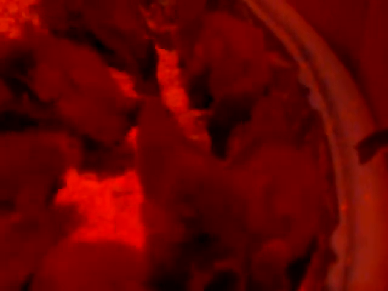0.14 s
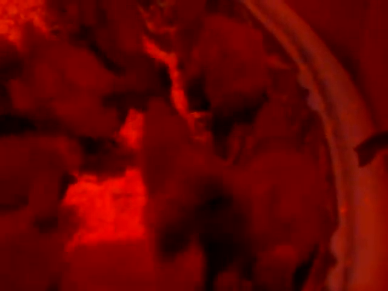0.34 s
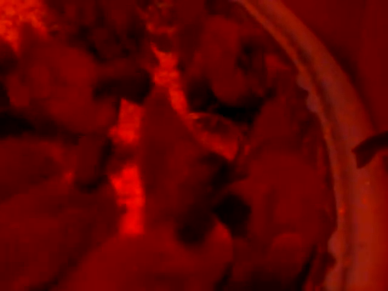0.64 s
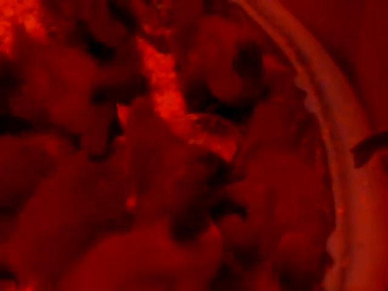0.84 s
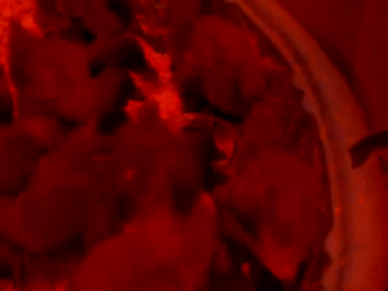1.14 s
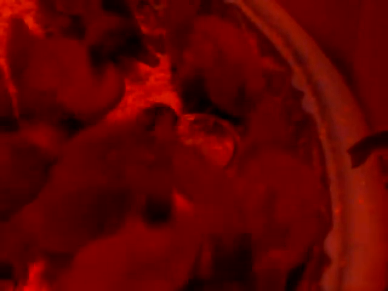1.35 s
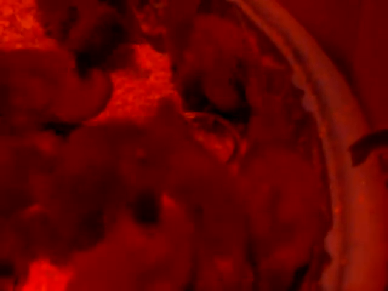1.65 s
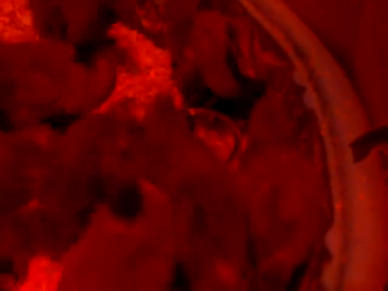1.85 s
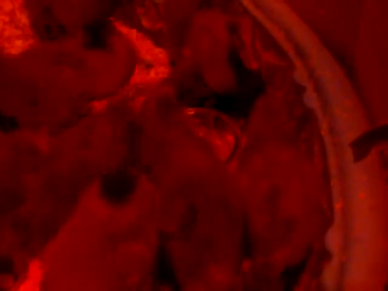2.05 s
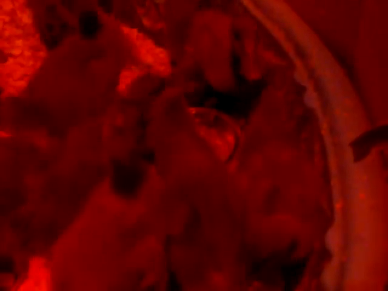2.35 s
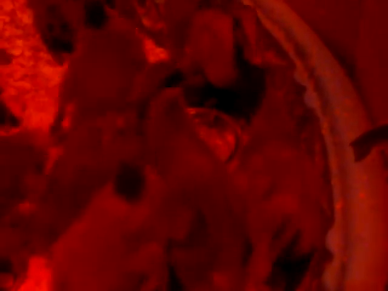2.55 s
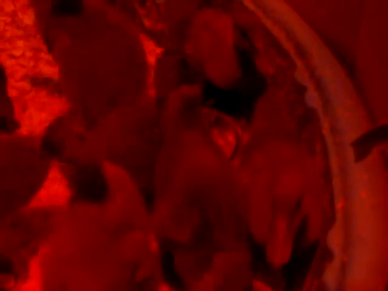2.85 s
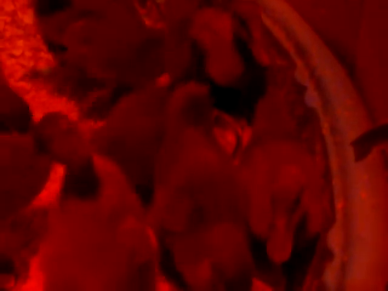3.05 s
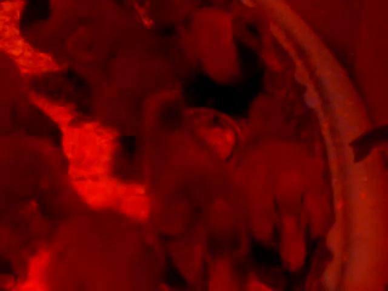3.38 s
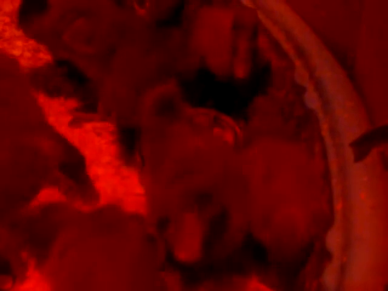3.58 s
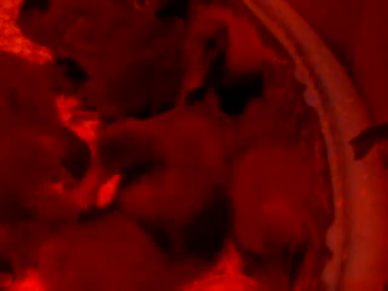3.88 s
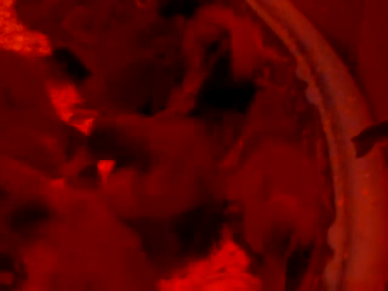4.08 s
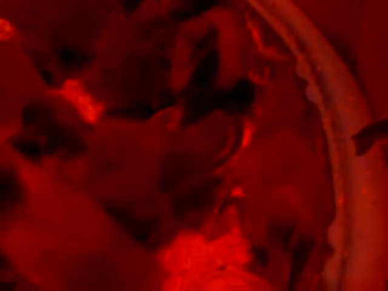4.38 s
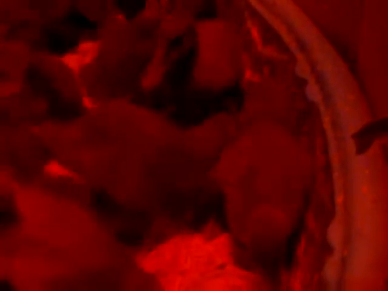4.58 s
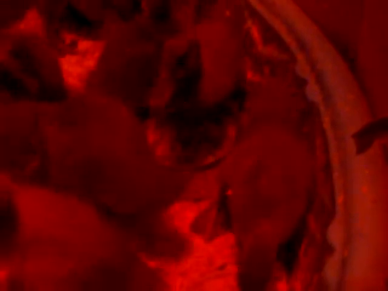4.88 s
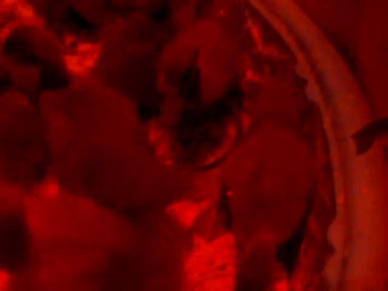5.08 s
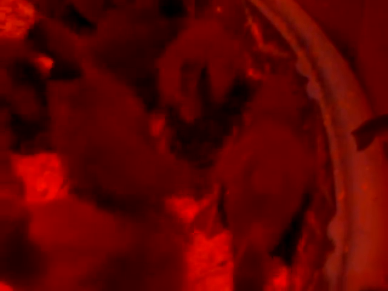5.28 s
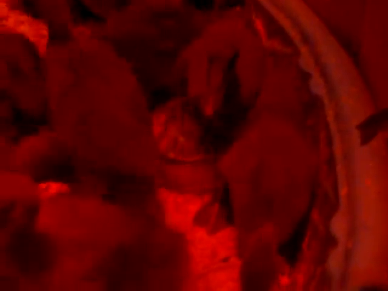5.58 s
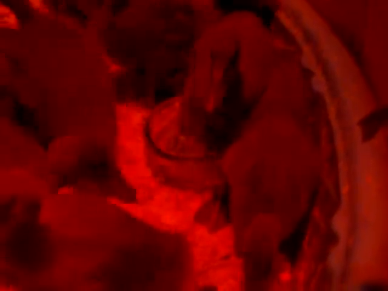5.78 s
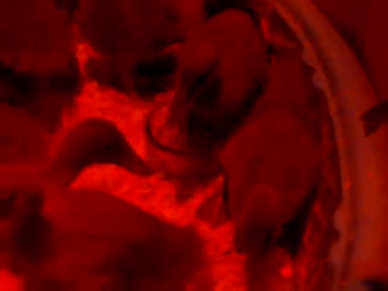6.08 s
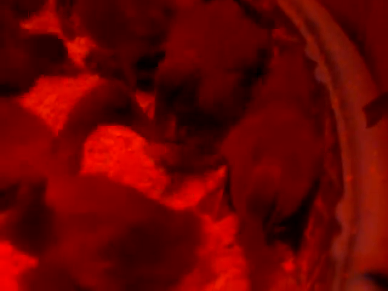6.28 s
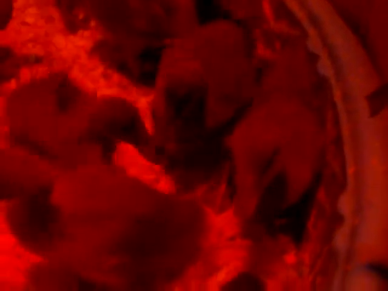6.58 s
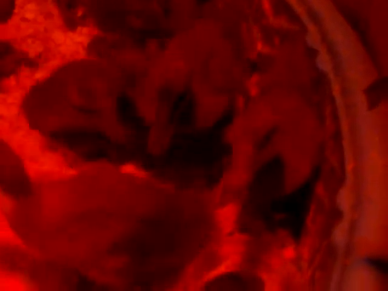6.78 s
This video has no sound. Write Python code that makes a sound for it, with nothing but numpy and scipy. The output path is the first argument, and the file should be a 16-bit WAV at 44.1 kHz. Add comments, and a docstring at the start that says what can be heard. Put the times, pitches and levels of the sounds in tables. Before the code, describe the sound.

Close to a group of ducklings in an indoor plastic brooder, dry clicks of pecking bills mix with crunching bedding and brief, whistling peeps. The feeding is busy at first, eases off, then gives way to small knocks and dull footfalls on the tub as the peeping returns and bunches up near the end. A metal part pings faintly a few times, and a soft hiss runs throughout.

```python
"""Ducklings peep round a feeder in a plastic brooder tub indoors, heard from close up.
Each peep is a short arched whistle of the syrinx, driven by one push of air. Bills snap at the feed,
dabble in the hollow dish and knock on the tub; feet thud, scuff and crunch the bedding, and a metal
part rings faintly. The tub walls and the room throw it all back, over a low drone and a steady hiss."""
import sys
import numpy as np
from scipy import signal
from scipy.fft import rfft, irfft, next_fast_len
from scipy.io import wavfile

SR = 44100
rng = np.random.default_rng(int(sys.argv[2]) if len(sys.argv) > 2 else 0)


def wav_out(sig):
    """Save sig, one row per channel (or a flat mono array), as 16-bit PCM at SR to the path in sys.argv[1]."""
    wavfile.write(sys.argv[1], SR, np.round(np.clip(np.atleast_2d(sig).T, -1, 1) * 32767).astype(np.int16))


N = 305613
TIME = np.arange(N) / SR


def peeps(rise_share=.44, rounding=.407, jitter=.0035, shimmer=.266, flutter_hz=270, side_ratio=1.6):
    """The syrinx whistles a near sine whose pitch and loudness arch with one push of air."""
    # one peep a row: top_s, length_s, top_hz, ends_hz, level_db, second_side_db (of the syrinx),
    # loudness_lag_s (behind the pitch), dip_db (at the top, negative thins it), rasp_db
    calls = [(0.574, .062, 2770, 1780, -56, -30, -0.01, 3, -18),
             (.950, 0.0654, 2670, 1600, -41, -11, 0.00035, -13.5, -8),
             (1.651, 0.055, 1750, 1454, -43.5, -30, -0.0035, -0.5, -16),
             (1.829, 0.052, 2296, 1503, -34.5, -14, -0.0045, -0.5, -17),
             (2.185, 0.068, 1985, 1512, -38.5, -29, -0.0015, 0.5, -14),
             (2.376, .058, 2275, 1574, -35.5, -20.5, -.001, 1.5, -30),
             (2.778, 0.058, 2302, 1480, -39, -17, 0.0016, -11.5, -10.5),
             (4.624, 0.05, 2088, 1492, -34.5, -30, -0.0019, 0, -30),
             (4.747, .076, 2260, 1616, -33.5, -32, 0.015, -2, -35),
             (5.120, 0.0596, 1962, 1430, -39, -28, -0.0011, 0, -17.5),
             (5.343, .0386, 1959, 1564, -35, -31, 0.00028, 1.5, -16),
             (5.706, 0.0492, 1964, 1450, -36.5, -33.5, -0.0024, 2, -21),
             (6.086, .066, 2414, 1724, -29.5, -40, 0.0067, -14.5, -27),
             (6.339, .05, 2257, 1644, -41, -40, -0.0024, -2, -22),
             (6.355, .054, 2844, 2145, -26.5, -43, -0.0053, -2, -21),
             (6.375, 0.0297, 2610, 2414, -30.5, -44, 0.0051, -0.5, -29),
             (6.395, 0.032, 2660, 2380, -33, -42.5, -0.0026, 1, -27)]
    out = np.zeros(N)
    for top, length, top_hz, ends_hz, db, side_db, lag, dip_db, rasp_db in calls:
        rise, fall = rise_share * length, (1 - rise_share) * length
        t = np.arange(-rise, fall, 1 / SR)
        off_top = t / np.where(t < 0, rise, fall)
        # a blunt arch: slack is 0 at the top and 1 at both ends
        slack = (np.hypot(off_top, rounding) - rounding) / (np.hypot(1, rounding) - rounding)
        hz = top_hz - slack * (top_hz - ends_hz)
        phase = 2 * np.pi * np.cumsum(hz * (1 + jitter * waver(len(t), 380))) / SR
        overtones = sum(amp(d) * np.sin(k * phase) for k, d in [(2, 0), (3, -11), (4, -19)])
        overtones *= amp(-21.5 - 27 * np.log2(top_hz / 2100))  # the higher the peep, the purer
        second_side = amp(side_db) * np.sin(side_ratio * phase)
        # slack membranes rasp; at a low pitch they also flap, chopping the ends of the note
        rasp = (amp(rasp_db) + amp(-7) * slack) * waver(len(t), 650)
        flap_depth = 1.1 * slack * np.clip((2000 - hz) / 400, 0, 1)
        flutter = flap_depth * np.sin(2 * np.pi * flutter_hz * t + waver(len(t), 160))
        upper = amp(.5) * (overtones + second_side) * (1 + .5 * waver(len(t), 325))
        tone = np.sin(phase) * (1 + rasp + flutter) + upper
        off_push = (t - lag) / np.where(t < lag, rise + lag, fall - lag)
        arch_db = -14 * (1 - np.exp(-(off_push / .55) ** 2))
        thinning_db = dip_db * np.exp(-(slack / .197) ** 2)
        push = amp(db + arch_db + thinning_db) * signal.windows.tukey(len(t), .15)
        add(out, top - rise, np.sqrt(2) * push * (1 + shimmer * waver(len(t), 72)) * tone)
    return out


def knocks(note_t60_s=.045, crack_s=.0045, rattle_s=.0263, trim_db=(-.8, -1, -14)):
    """A bill or foot rings the damped plastic tub, with a crack of contact and a rattle of feed."""
    # blows on the tub: start_s, level_db, note_hz (of the spot struck), brightness_db
    hits = [(0.291, -43, 580, 2.5), (.306, -49.5, 480, -1.5), (.595, -30.5, 905, 1), (.597, -30.5, 630, .5),
            (1.395, -43.5, 1246, 9), (3.711, -53, 586, 3), (4.393, -52, 556, -0.5), (5.198, -55.5, 487, -3),
            (5.312, -34.5, 480.8, 8), (5.335, -37.5, 433, -5), (5.592, -33, 430, 5.5),
            (5.606, -43, 405, -9), (5.778, -43, 443, -3.5), (5.866, -39.5, 521, -2.5),
            (5.896, -49, 533, -2), (5.911, -48, 550, 0.5), (5.983, -31.5, 415, 3), (6.011, -45, 410, -5.5),
            (6.048, -47.5, 403, 0.5), (6.132, -56.5, 560, -8.5), (6.172, -40, 408, -2),
            (6.201, -45.5, 502, -2.5), (6.219, -42.5, 462, -4.5), (6.272, -44.5, 397.3, -4),
            (6.435, -46, 568, -8), (6.464, -42.5, 588, 5.5)]
    # modes of the tub: pitch_hz, level_db, t60_s
    tub = [(410, 2.5, 0.041), (450, 4, 0.04), (521, -1, 0.049), (584, 1, 0.042), (703, -2, 0.029),
           (792, 3.5, 0.022), (890, -0.5, 0.029), (998, 3.5, 0.029), (1150, 10.5, .013), (1252, 3, 0.021),
           (1492, 0.5, 0.026), (1827.4, -2.5, 0.035), (2226, 5.5, 0.0212), (2850, 1.5, 0.0087)]
    # borders of the low, middle and high band: edge_hz
    edges = [255, 700, 1500, 5000]
    out, t = np.zeros(N), np.arange(SR // 5) / SR
    contact = amp(2) * np.exp(-t / crack_s) + amp(-8) * np.exp(-t / rattle_s)
    for start, db, note_hz, brightness_db in hits:
        # the struck spot radiates little below its own note
        modes = [(hz, mode_db - 9 * max(np.log2(note_hz / hz), 0), t60) for hz, mode_db, t60 in tub]
        low_cut = signal.butter(2, .7 * note_hz, "high", fs=SR, output="sos")
        body = ring([*modes, (note_hz, 1, note_t60_s)], t, detune=.017, spread_db=1.5)
        blow = signal.sosfilt(low_cut, body + contact * rng.standard_normal(len(t)))
        bands_db = db + brightness_db * np.arange(-1, 2)  # a harder contact trades bass for treble
        add(out, start, balance_bands(blow, edges, bands_db + trim_db, span_s=.027))
    return out


def snaps(crack_s=.0005, crumble_s=.0035, faint_count=10, busy_until_s=2.6, trim_db=-.5):
    """A bill shuts on a crumb: a dry crack and a brief crumbling ring the hollow of the bill."""
    # clear snaps at the feed: start_s, ring_hz, low_db, mid_db, high_db
    clear = [(0.0511, 9540, -73, -60.5, -49.0), (0.0842, 2230, -41.5, -64, -69),
             (0.1063, 6900, -55, -53.5, -48), (0.1192, 1960, -50, -53, -54.5),
             (0.1827, 6930, -68.5, -55, -49.5), (0.2548, 2120, -52, -53, -53),
             (0.3302, 4080, -52.5, -40.5, -48.5), (0.4294, 4170, -48.5, -40, -47),
             (0.4741, 6260, -62, -48.5, -45.5), (0.6687, 3910, -50.5, -43, -59),
             (0.6791, 10000, -47.5, -51, -46), (0.6932, 2560, -48.5, -53, -48),
             (0.7482, 1280, -44, -51, -60), (0.797, 4170, -42.5, -36.5, -52),
             (0.8026, 1830, -41, -50.5, -58), (0.8201, 1910, -45.5, -41.5, -44),
             (0.8576, 2360, -46.5, -50, -51.5), (0.8676, 7500, -62.5, -70, -47.5),
             (0.89, 2270, -56.0, -56.5, -56.0), (1.1143, 5090, -70, -55, -54),
             (1.1271, 1840, -47, -49.5, -52), (1.1481, 1230, -45.0, -56, -55),
             (1.169, 1265, -51.5, -50.5, -62.0), (1.1736, 1215, -44.5, -50, -50),
             (1.1964, 7050, -57, -65.5, -45), (1.2268, 3620, -43.5, -41.5, -61),
             (1.2333, 1933, -46, -57, -55), (1.2461, 1540, -49.5, -50, -55),
             (1.2851, 11710, -54, -54, -51.5), (1.3566, 1220, -45.0, -55.5, -59),
             (1.4096, 1380, -45, -63.5, -62.5), (1.4124, 1596, -49, -58.5, -51),
             (1.4225, 2355, -50, -62, -53), (1.7491, 8500, -69.5, -52.5, -45.0),
             (1.7742, 7480, -55, -50, -49.5), (1.7802, 2316, -42, -54.5, -57),
             (1.8039, 1850, -48.5, -44.0, -42.5), (1.8931, 1860, -47, -62, -66),
             (1.9796, 4660, -47, -40, -43.5), (1.9851, 5350, -53, -43.5, -54),
             (2.0302, 1860, -45.0, -55.0, -51.5), (2.0368, 4090, -56, -45, -56),
             (2.0747, 1264, -43.5, -55.5, -61), (2.0937, 4050, -57.0, -46, -51),
             (2.1303, 8650, -61.5, -51.5, -50), (2.2012, 4080, -40, -35.5, -46.5),
             (2.2354, 11400, -49.0, -59.5, -45), (2.2601, 3960, -47.5, -41.5, -57.0),
             (2.3117, 5800, -67.5, -50, -45), (2.4746, 1276, -48, -57.5, -64.5),
             (2.5219, 4300, -66.5, -42.5, -57.5), (2.5692, 9050, -63, -65.5, -54.5),
             (2.6836, 4380, -72.5, -52.5, -62.5), (2.8272, 1980, -47.5, -56, -53.0),
             (2.8315, 1920, -49, -67, -64), (3.2883, 7210, -52, -53, -48.5),
             (3.3522, 3820, -52.5, -38.5, -58.5), (3.4084, 3520, -61, -53, -70.0),
             (3.5053, 3620, -55.5, -53.5, -58.5), (3.528, 3840, -64.5, -50.5, -62),
             (4.1115, 1520, -57, -57.5, -67), (4.1381, 10060, -59, -59.0, -53.5),
             (4.3012, 4140, -59, -48.5, -52), (4.4304, 11910, -66.5, -64, -52.5),
             (4.8641, 2610, -49.5, -51, -57), (5.3096, 1150, -37.5, -53, -46),
             (6.4788, 10500, -52.5, -65.5, -51), (6.4954, 1725, -46, -51.5, -54),
             (6.7342, 10250, -52.5, -58.5, -50.5)]
    # broad resonances of a bill: frequency_hz, level_db
    bill = [(900, 2), (1900, 4), (2900, -6.5), (4000, 6), (5200, -5.5), (9000, -3), (11000, -8.5),
            (14500, -18)]
    # borders of the low, middle and high band: edge_hz
    edges = [1100, 2800, 5200, 14500]
    out, t = np.zeros(N), np.arange(SR // 16) / SR
    envelope = np.exp(-t / crack_s) + amp(-11) * np.exp(-t / crumble_s)
    hz, db = np.transpose(bill)
    faint = [(rng.uniform(0, busy_until_s), rng.uniform(1500, 7500), *rng.normal(-60.5, 4.5, 3))
             for _ in range(faint_count)]
    for start, ring_hz, *bands_db in [*clear, *faint]:
        colour = np.transpose([hz, db + rng.normal(0, 3, len(hz))])
        crack = coloured(envelope * rng.standard_normal(len(t)), colour) * (t < .04)
        hollow = amp(9) * signal.lfilter(*signal.iirpeak(ring_hz, Q=9, fs=SR), crack)
        add(out, start, balance_bands(crack + hollow, edges, np.add(bands_db, trim_db), span_s=.011))
    return out


def dabbling(strokes_per_s=18.1, stroke_spread_db=3.9, attack_s=.0017):
    """A dabbling bill pushes in quick even strokes; each sets the hollow dish humming briefly."""
    # bouts of dabbling: start_s, end_s, level_db, note_hz (lowest mode of the dish)
    bouts = [(0.03, .11, -46, 433.5), (0.209, .34, -48.5, 433.8), (.405, .58, -55, 442),
             (0.676, .75, -48, 430), (1.176, 1.47, -55.5, 424), (1.584, 1.61, -45.5, 441.2),
             (1.783, 2.3, -51, 409.7), (2.707, 2.74, -51.5, 407)]
    # modes of the feed dish: pitch_hz, level_db, t60_s
    dish = [(418.5, 3, 0.089), (454, 4, 0.0388), (861, -2, 0.046), (970, 0.5, 0.056)]
    out, t = np.zeros(N), np.arange(SR // 5) / SR
    onset = 1 - np.exp(-t / attack_s)
    for start, end, db, note_hz in bouts:
        modes = np.multiply(dish, [note_hz / dish[0][0], 1, 1])
        for stroke in np.arange(start, end, 1 / strokes_per_s):
            push = amp(db - rng.normal(0, stroke_spread_db))
            add(out, stroke, push * onset * ring(modes, t, detune=.04, spread_db=2))
    return out


def pings(modes_hz=(1915, 4820), t60s_s=(.13, .04)):
    """Two thin metal modes ring on after a light touch."""
    # touches on a metal part: start_s, low_mode_db, high_mode_db
    touches = [(.540, -46.5, -36.5), (2.700, -52, -47), (2.791, -50, -42), (2.980, -53, -73.5),
               (3.188, -52, -72), (4.462, -43.5, -52), (6.294, -42, -70.5), (6.602, -55.5, -49)]
    out, t = np.zeros(N), np.arange(SR // 4) / SR
    for start, *levels_db in touches:
        for hz, t60, db in zip(modes_hz, t60s_s, levels_db):
            add(out, start, amp(db - 60 * t / t60) * np.sin(2 * np.pi * hz * t))
    return out


def scuffs():
    """A webbed foot drags a clump of crackles out of the bedding, or scrapes dully along the floor."""
    # foot drags: start_s, length_s, level_db, tilt_db_per_octave
    drags = [(0.09, 0.041, -48, -3), (0.289, 0.0421, -54, -8), (0.672, 0.029, -51.5, 1),
             (1.34, 0.0314, -53, -5), (1.396, .03, -57.5, -7), (2.059, 0.0447, -53, -3.5),
             (2.16, .035, -49.5, -.5), (2.897, 0.028, -56, -3), (3.105, 0.026, -54.5, -2.5),
             (3.634, .05, -56, -2.5), (3.708, 0.0144, -49.5, -3), (3.73, 0.033, -55.5, -2.5),
             (3.994, 0.028, -57.5, -6), (4.038, 0.025, -55, -7.5), (4.068, 0.018, -50, -6.5),
             (4.263, 0.0196, -53.5, -1.5), (4.394, 0.02, -56, -9), (4.854, 0.0236, -49.5, 2.5),
             (5.184, 0.027, -52.5, -1), (5.771, 0.02, -48.5, 5), (5.9, .044, -49.5, 0.5),
             (6.03, 0.059, -56, 7), (6.445, 0.038, -58, -0.5), (6.547, 0.0313, -46, -1.5),
             (6.632, 0.0347, -49.5, 0), (6.724, 0.036, -50.5, -1.5)]
    # spectrum of a scuff before its tilt: frequency_hz, level_db
    scuff_colour = [(200, -36), (700, -2.5), (2000, -2.5), (4000, -2.5), (6500, -1.5), (10500, -1),
                    (13000, -11), (16000, -36.5)]
    out = np.zeros(N)
    hz, colour_db = np.transpose(scuff_colour)
    for start, length, db, tilt in drags:
        size = round(length * SR)
        crackle = grains(size, per_s=900, spread_db=3.5, decay_s=.001)
        colour = np.transpose([hz, colour_db + tilt * np.log2(hz / hz[0])])
        add(out, start, amp(db) * coloured(crackle, colour) * signal.windows.tukey(size, .4))
    return out


def steps(attack_s=.00134, decay_s=.0254):
    """A duckling's weight lands on the tub floor as a dull thud."""
    # soft footfalls: start_s, level_db
    footfalls = [(.6, -52.5), (3.722, -60.5), (4, -52.5), (4.075, -58), (4.395, -61), (5.6, -53.5),
                 (5.989, -52), (6.175, -67.5), (6.275, -58.5)]
    # spectrum of the thud: frequency_hz, level_db
    thud_colour = [(30, -29.5), (100, -10.5), (170, 0), (260, -0.5), (500, -3.5), (1200, -25),
                   (4000, -71.5)]
    out, t = np.zeros(N), np.arange(SR // 6) / SR
    envelope = (1 - np.exp(-t / attack_s)) * np.exp(-t / decay_s)
    for start, db in footfalls:
        add(out, start, amp(db) * envelope * coloured(rng.standard_normal(len(t)), thud_colour))
    return out


def bustle():
    """A bed of countless small sounds: bills dabble, feet tread and dry bedding crunches."""
    # how busy the flock is: time_s, tread_db, crunch_db
    activity = [(0, -55, -56.5), (.35, -59.5, -58), (.65, -58, -51), (1.03, -66, -57), (1.3, -55, -55),
                (1.5, -57.5, -61), (1.75, -55, -62), (2.25, -58, -54), (2.42, -62, -56.5),
                (2.8, -56.5, -58.5), (3.35, -64, -60), (4.05, -61.5, -65), (4.3, -58, -59.5),
                (4.9, -62.5, -63), (5.6, -57.5, -54.5), (6, -56, -58.5), (6.35, -54, -54.5),
                (6.93, -60.5, -58)]
    # a duckling shoves through the others, swelling the low rustle: peak_s, length_s, level_db
    shoves = [(0.729, 0.162, -59), (1.317, 0.102, -65), (2.849, 0.075, -71), (3.75, 0.165, -61),
              (4.034, 0.22, -62), (4.461, 0.074, -54.5), (5.459, 0.089, -49)]
    # spectra of the three textures: frequency_hz, level_db
    dabble_colour = [(100, -30), (250, -11.5), (340, -6), (420, -0.5), (520, -0.5), (750, -1.5),
                     (1200, -6.5), (2500, -33)]
    tread_colour = [(300, -23), (800, 1.5), (1300, 3), (2000, 1), (3000, -1.5), (4200, -2), (7000, -11.5)]
    crunch_colour = [(1500, -38.5), (3500, 10), (6000, 8.5), (10500, 11.5), (13000, 6), (16000, -28)]
    times, *levels_db = np.transpose(activity)
    rustle_gain, crunch_gain = (amp(np.interp(TIME, times, db)) for db in levels_db)
    for peak, length, db in shoves:
        add(rustle_gain, peak - length / 2, amp(db) * np.hanning(round(length * SR)))
    dabs = coloured(grains(N, per_s=90, spread_db=3.2, decay_s=.012), dabble_colour)
    treads = coloured(grains(N, per_s=400, spread_db=3.8, decay_s=.0038), tread_colour)
    crunches = coloured(grains(N, per_s=130, spread_db=4.8, decay_s=.0012), crunch_colour)
    return rustle_gain * (amp(-8.5) * dabs + amp(-2) * treads) + crunch_gain * amp(-4) * crunches


def hiss(level_db=-58):
    """A steady, soft hiss, fullest in the low mids."""
    # spectrum of the hiss: frequency_hz, level_db
    hiss_colour = [(15, -50), (25, -37), (43, -36.5), (99, -13), (161, -22), (255, 0), (342, -7), (500, -1),
                   (1470, -3), (2970, -13.5), (7030, -11.5), (7830, -8), (10500, -10.5), (14600, -20),
                   (15800, -58)]
    return amp(level_db) * coloured(rng.standard_normal(N), hiss_colour)


def drone(wobble=.015163):
    """A faint low tone wavers in the room."""
    # path of the tone: time_s, pitch_hz, level_db
    path = [(0, 105.4, -86), (.8, 111.5, -90.5), (1.8, 112.7, -79), (2.0, 105, -101.5), (3.5, 90.7, -104),
            (3.8, 92.21, -91), (6.93, 92.38, -90.5)]
    times, *columns = np.transpose(path)
    hz, db = (np.interp(TIME, times, column) for column in columns)
    phase = 2 * np.pi * np.cumsum(hz * (1 + wobble * waver(N, 12))) / SR
    return amp(db) * np.sqrt(2) * np.sin(phase)


def brooder(x, walls_db, room_db, walls_decay_s=.0065, count=14):
    """Adds quick reflections off the tub walls, then the faint tail of the room."""
    # decay of the room: frequency_hz, t60_s
    room_t60 = [(200, 0.27), (600, 0.2), (2500, 0.21), (6000, 0.14747), (14000, 0.095)]
    t = np.arange(SR // 2) / SR
    walls = np.zeros(len(t))
    delays = rng.uniform(.001487, .022, count)
    walls[(delays * SR).astype(int)] = rng.choice([-1, 1], count) * np.exp(-delays / walls_decay_s)
    hz, age, spectra = signal.stft(rng.standard_normal(len(t)) * (t > .01), SR, nperseg=256)
    fade = amp(-60 * age / curve_at(room_t60, hz)[:, None])
    tail = signal.istft(spectra * fade, SR, nperseg=256)[1][:len(t)]
    echoes = amp(walls_db) * walls / np.linalg.norm(walls) + amp(room_db) * tail / np.linalg.norm(tail)
    return x + signal.fftconvolve(x, echoes)[:N]


def amp(db):
    """Decibels to gain."""
    return 10 ** (np.asarray(db) / 20)


def unit(x):
    """Scales to rms 1."""
    return x / np.sqrt(np.mean(x ** 2) + 1e-20)


def curve_at(points, hz):
    """Reads a curve on a log-frequency axis."""
    points_hz, values = np.transpose(points)
    return np.interp(np.log(hz + 1), np.log(points_hz + 1), values)


def add(mix, start_s, sound):
    """Mixes a sound in at start_s."""
    part = mix[max(round(start_s * SR), 0):][:len(sound)]
    part += sound[:len(part)]


def coloured(x, colour):
    """Shapes x with an EQ curve, at rms 1."""
    size = next_fast_len(len(x))
    gain = amp(curve_at(colour, np.fft.rfftfreq(size, 1 / SR)))
    return unit(irfft(rfft(x, size) * gain, size)[:len(x)])


def ring(modes, t, detune, spread_db):
    """Dying modes; each blow lands elsewhere and so weights them anew."""
    hz, db, t60 = np.transpose(modes)[:, :, None]
    shift, weight, side = rng.standard_normal((3, len(modes), 1))
    envelopes = np.sign(side) * amp(db + spread_db * weight - 60 * t / t60)
    return (envelopes * np.sin(2 * np.pi * hz * (1 + detune * shift) * t)).sum(0)


def balance_bands(blow, edges_hz, levels_db, span_s):
    """Sets the strength of a blow in each band, as rms over span_s."""
    out = 0
    for low, high, db in zip(edges_hz, edges_hz[1:], levels_db):
        band = signal.sosfilt(signal.butter(3, [low, high], "band", fs=SR, output="sos"), blow)
        out = out + amp(db) * band * np.sqrt(span_s * SR / np.sum(band ** 2))
    return out


def grains(size, per_s, spread_db, decay_s):
    """Random tiny fractures of uneven strength, each a fast-dying puff of noise."""
    strength = amp(spread_db * np.minimum(rng.exponential(1, size), 4))
    strength *= rng.random(size) < per_s / SR
    power = signal.lfilter([1], [1, -np.exp(-2 / (decay_s * SR))], strength ** 2)
    return np.sqrt(power + 1e-6) * rng.standard_normal(size)


def waver(size, rate_hz):
    """Smooth random motion up to rate_hz, at rms 1."""
    smoothing = signal.butter(4, rate_hz, fs=SR, output="sos")
    return unit(signal.sosfilt(smoothing, rng.standard_normal(size + SR // 20))[-size:])


def scene():
    """The flock in its tub; raised heads peep clear of the walls that surround the feeding."""
    feeding = knocks() + snaps() + amp(.5) * (dabbling() + pings())
    floor = brooder(feeding + scuffs() + steps() + bustle(), walls_db=-5.5, room_db=-13.5)
    voices = brooder(amp(.1) * peeps(), walls_db=-8.5, room_db=-16)
    return (voices + floor + hiss() + drone())[None]


def record(dry, notch_hz=7867, cutoff_hz=15500):
    """Master EQ: a narrow notch in the treble and a steep high cut."""
    notched = signal.lfilter(*signal.iirnotch(notch_hz, Q=14, fs=SR), dry)
    high_cut = signal.firwin(401, cutoff_hz, window=("kaiser", 8), fs=SR)
    return signal.oaconvolve(notched, high_cut[None], "same")


dry = scene()
out = record(dry)
wav_out(out)
```